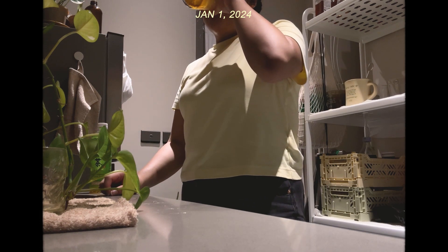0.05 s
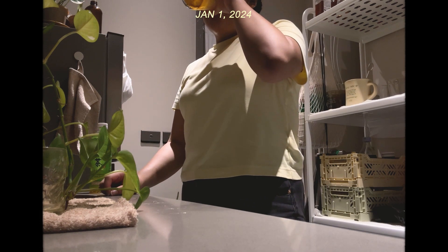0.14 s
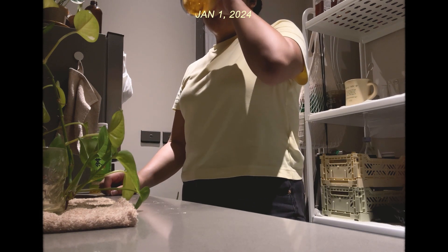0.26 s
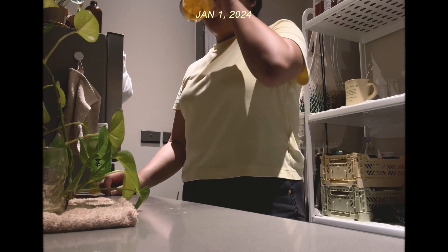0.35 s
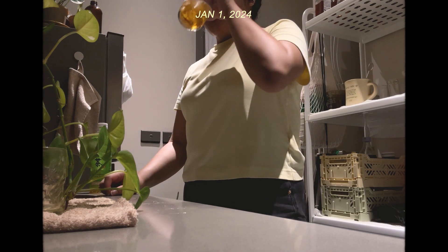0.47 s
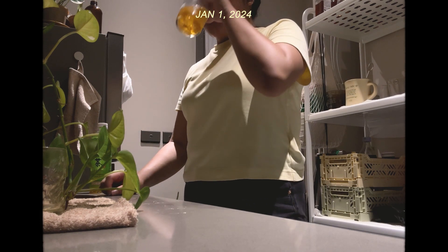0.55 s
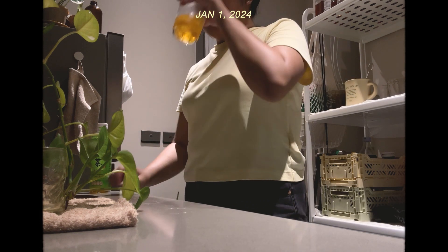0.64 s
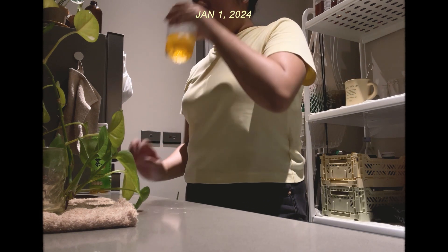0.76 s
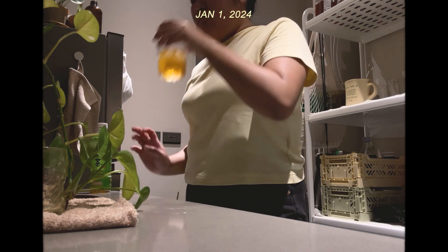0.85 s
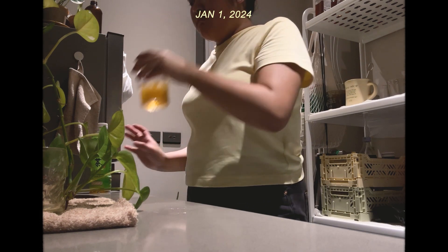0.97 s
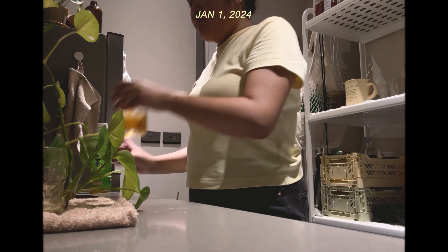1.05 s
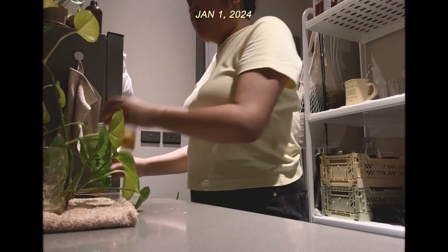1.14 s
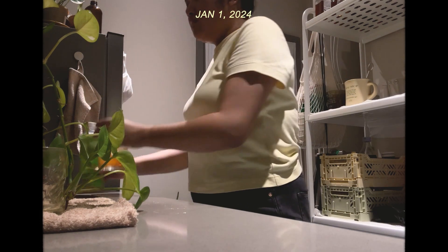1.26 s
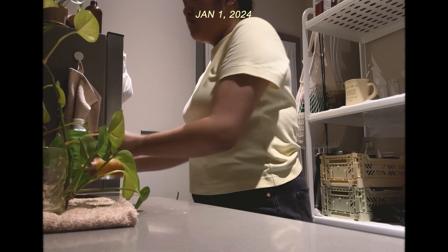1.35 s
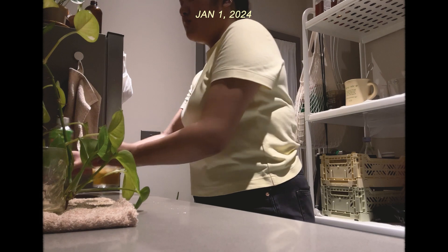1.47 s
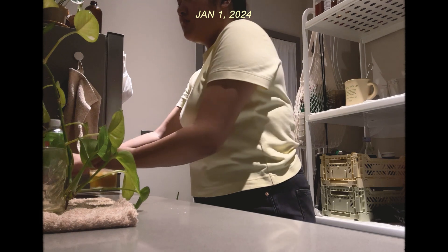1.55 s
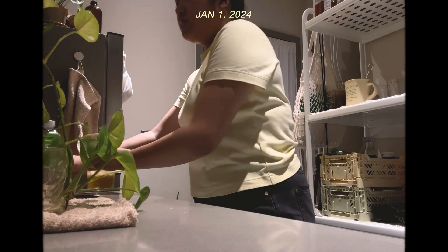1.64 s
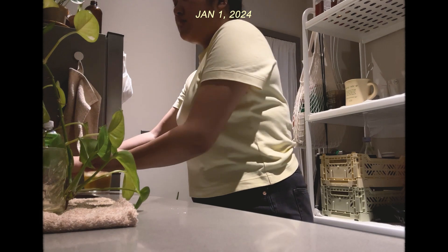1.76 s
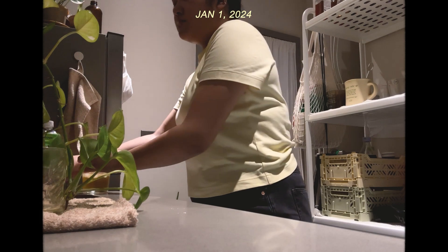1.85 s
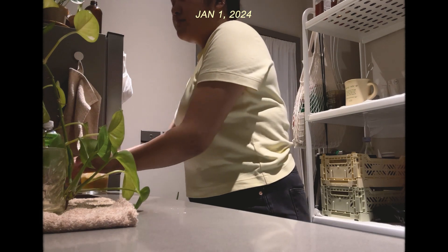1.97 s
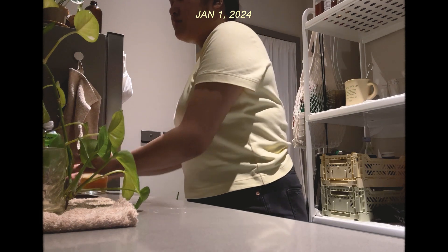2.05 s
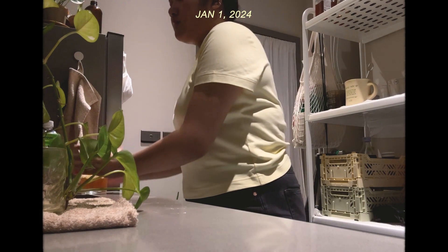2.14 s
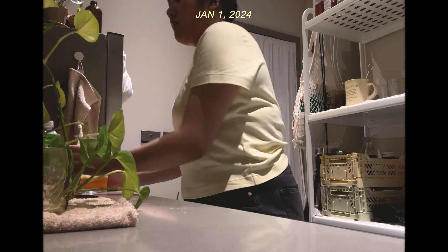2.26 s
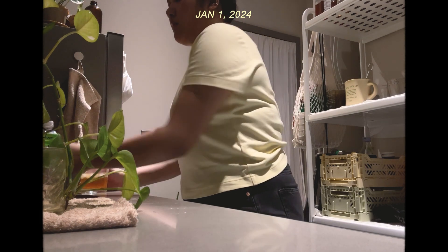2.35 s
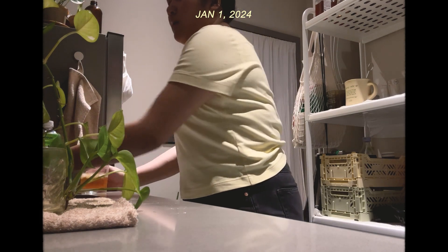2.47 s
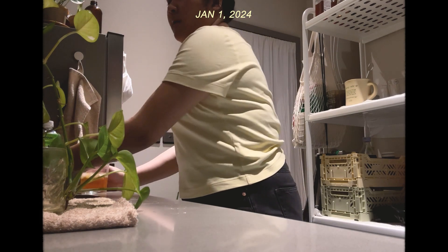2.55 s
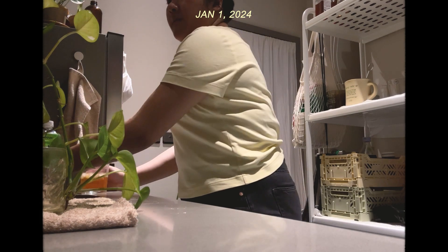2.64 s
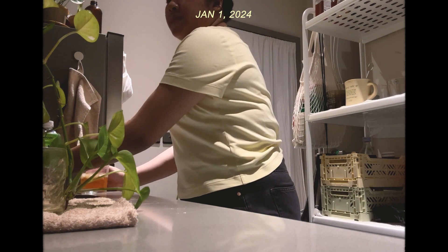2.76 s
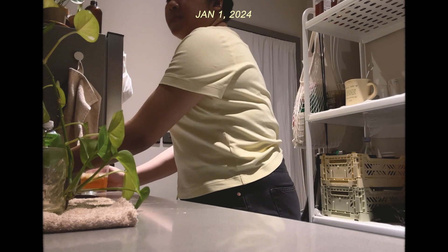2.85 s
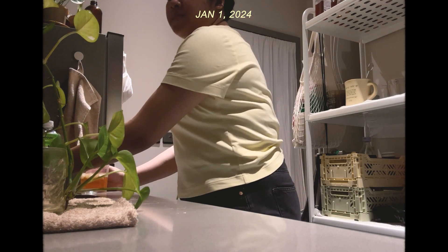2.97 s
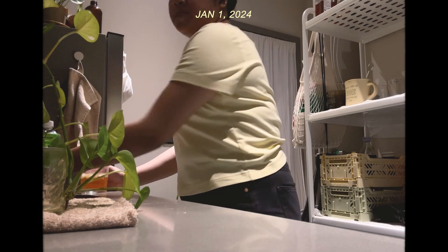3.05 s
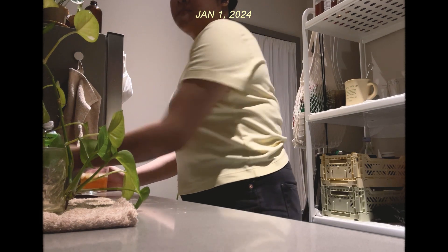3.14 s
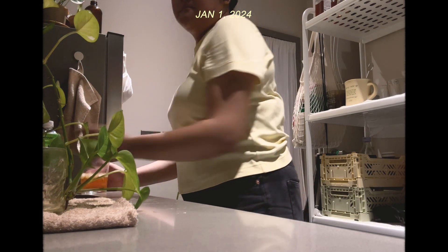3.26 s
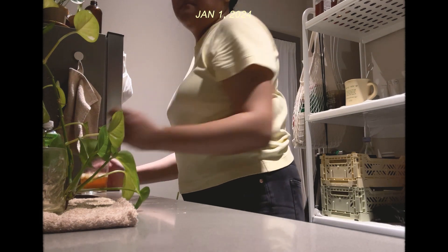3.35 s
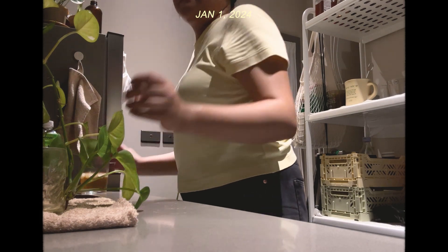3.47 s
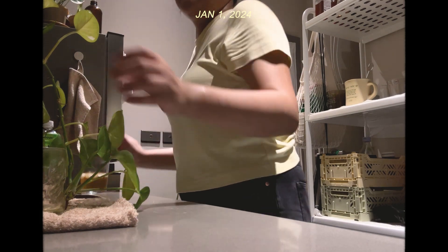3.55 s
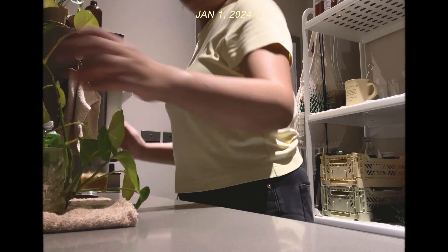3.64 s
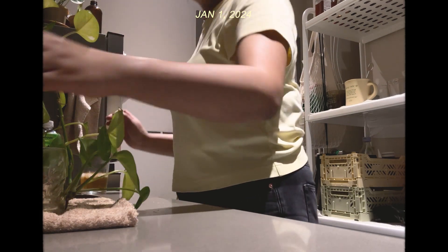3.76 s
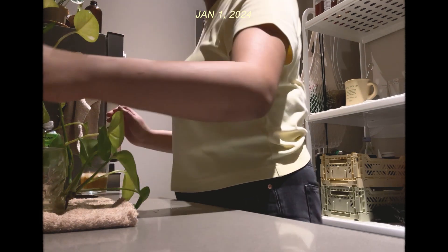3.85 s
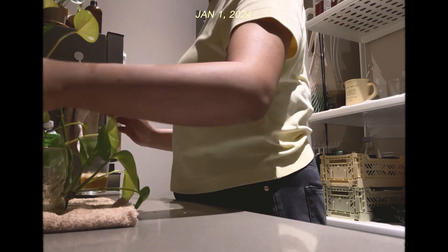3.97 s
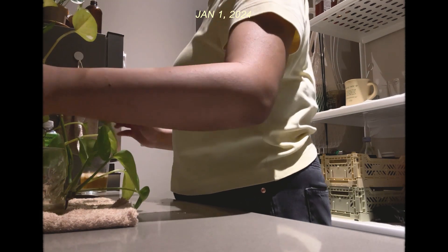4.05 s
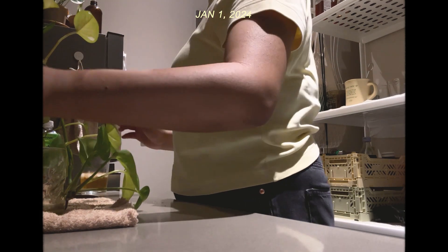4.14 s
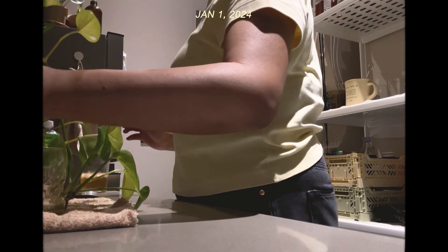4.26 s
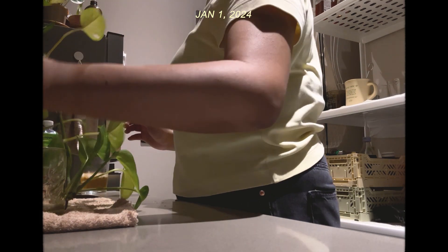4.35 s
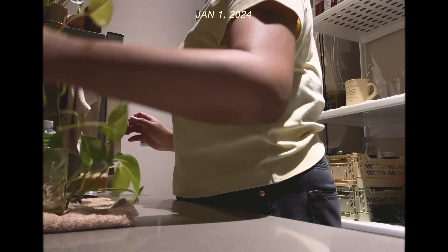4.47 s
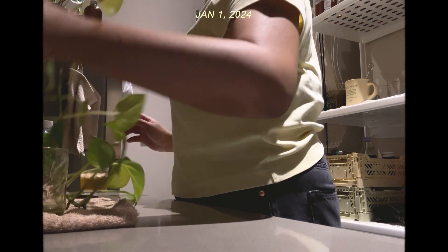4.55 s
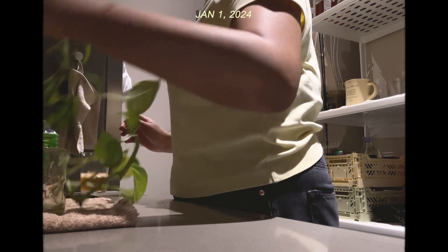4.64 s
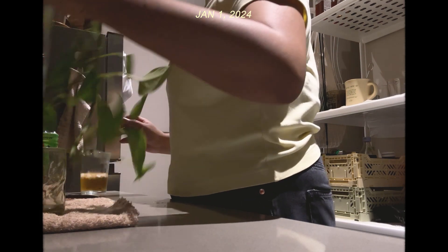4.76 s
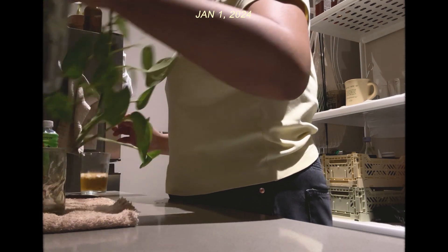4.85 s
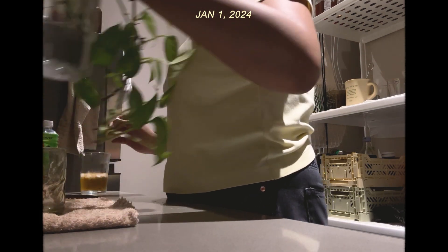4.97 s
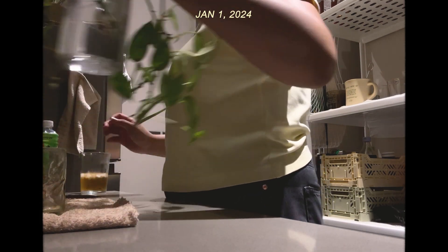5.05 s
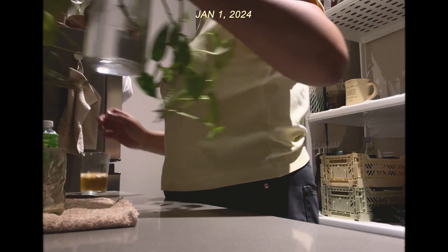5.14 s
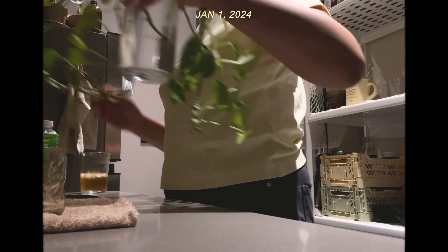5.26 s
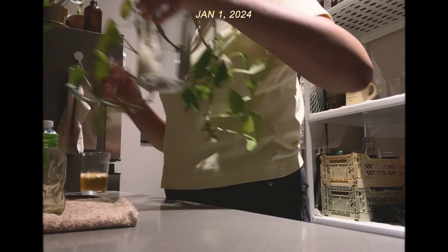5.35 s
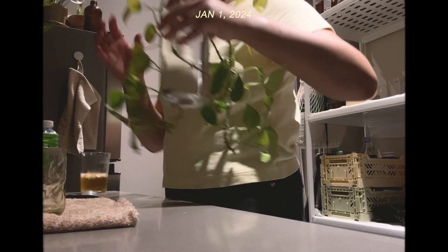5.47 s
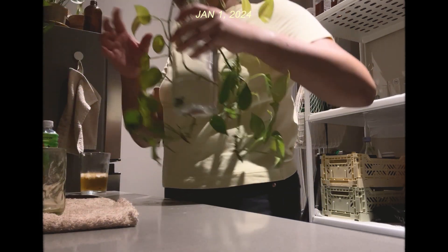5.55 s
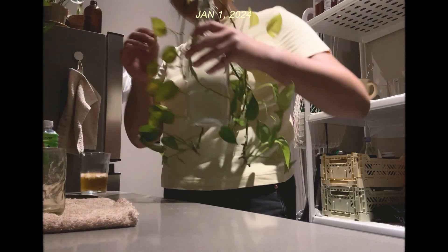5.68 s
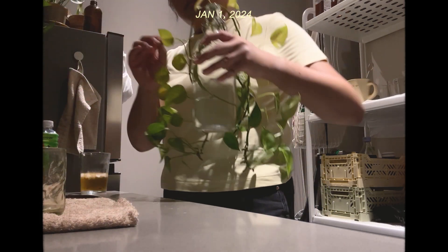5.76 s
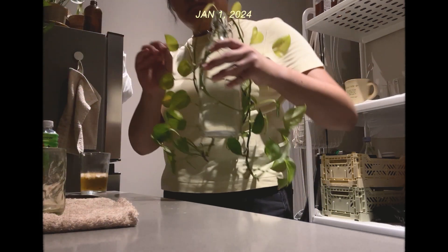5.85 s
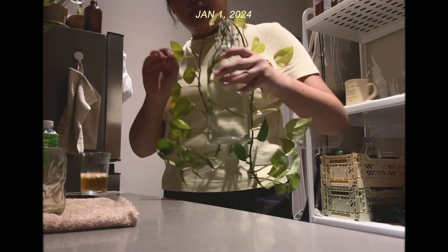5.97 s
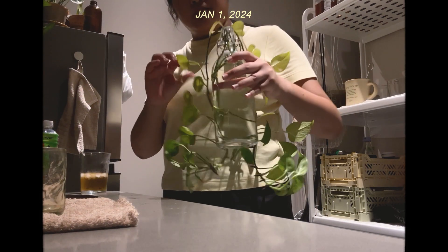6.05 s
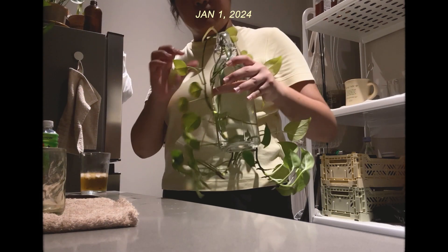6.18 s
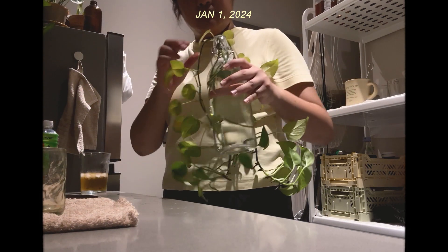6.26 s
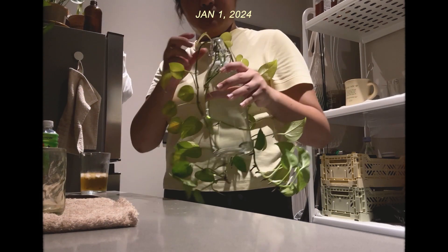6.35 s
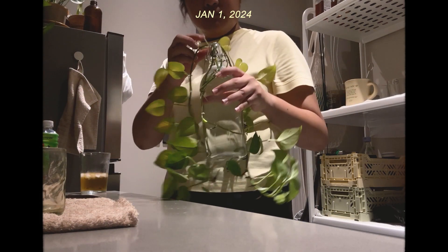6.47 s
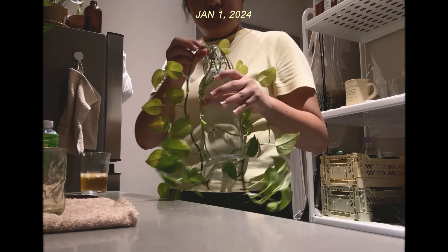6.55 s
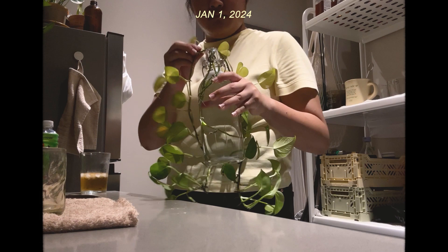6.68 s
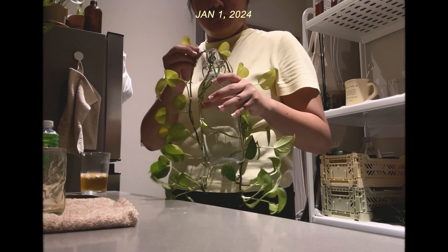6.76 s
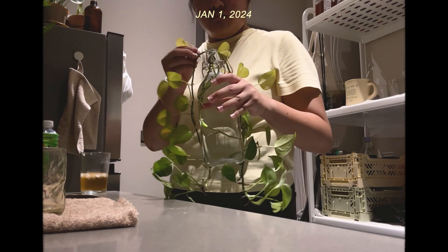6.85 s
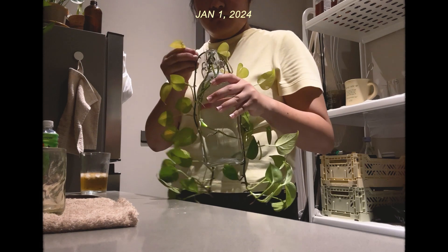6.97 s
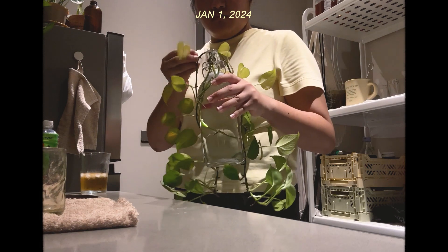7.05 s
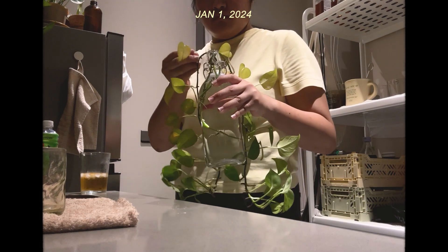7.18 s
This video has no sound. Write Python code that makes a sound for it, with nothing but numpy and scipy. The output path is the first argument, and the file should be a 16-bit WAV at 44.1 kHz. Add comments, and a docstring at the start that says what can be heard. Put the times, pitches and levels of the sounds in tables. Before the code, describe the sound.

Ice tinkles in a glass set down hard on a stone counter, then glass jars chatter together over a low ventilation drone.

```python
"""Over the drone of air handling, ice tinkles in a drinking glass that is lowered and set on a stone counter.
Then a glass jar of trailing leaves chatters against its neighbour; leaves and cloth rustle and tick throughout.
Glass, ice and stone are sums of fading tones with short noise cracks; leaves, cloth and drone are shaped noise.
Two microphones on the counter hear the direct sounds and the echoes of a small kitchen."""
import sys
import numpy as np
from scipy import signal
from scipy.fft import rfft, irfft
from scipy.io import wavfile
from scipy.ndimage import uniform_filter1d

SR = 44100
rng = np.random.default_rng(int(sys.argv[2]) if len(sys.argv) > 2 else 0)


def ratio_of_db(decibels):
    """Turn decibels (scalar or array-like) into linear amplitude factors; 0 dB maps to 1."""
    return 10 ** (np.asarray(decibels, float) / 20)


def store_pcm(level_fs):
    """Save levels as 16-bit WAV."""
    pcm = np.round(np.clip(level_fs, -1, 1) * 32767).astype(np.int16)
    wavfile.write(sys.argv[1], SR, np.atleast_2d(pcm).T)


N = 317961
TIME = np.arange(N) / SR  # seconds
HZ = np.maximum(np.fft.rfftfreq(N, 1 / SR), 1)
LEFT_RIGHT = np.array([[.5], [-.5]])  # splits a left-minus-right difference over the two sides


def ice():
    """Cubes rattle against the tumbler wall; sloshing drink shifts the pitches a little."""
    # Clear taps of ice on the wall. Each row: start in seconds, level in dB, pitch the spot favours in Hz.
    clear_taps = [(0.241, -69, 5400), (0.2567, -64.5, 3950), (0.4572, -48.5, 5760), (0.5969, -37.5, 5200),
                  (0.631, -53, 4220), (0.7444, -58, 5440), (0.83, -65, 4800), (0.8777, -62, 4600),
                  (0.9224, -58, 6350), (1.055, -54, 5300), (1.0785, -42, 5330), (1.307, -55.5, 6010),
                  (1.352, -49.5, 4600), (1.4654, -57, 6700), (1.7, -69, 5000), (1.7419, -63, 5570),
                  (1.9487, -62, 4470), (2.0016, -62, 6000), (2.0767, -68, 4500), (2.1293, -73, 3950),
                  (2.1994, -81, 6060), (2.261, -75, 3900), (2.3414, -111, 5900), (2.9222, -60, 5250)]
    # Tones of the tumbler. Each row: pitch in Hz, level in dB, time to fade by 60 dB in seconds.
    tumbler = [(2240, -14, .08), (3950, -9, .12), (4470, -3, .14), (4950, -9, .08), (5390, -5, .08),
               (5990, -2, .13), (8100, -5, .04), (8760, -6, .05), (10500, -7, .04), (12700, -18, .04)]
    # fainter taps while the drink sloshes
    slosh_start_s, slosh_end_s, slosh_taps = .22, 2.4, 60
    slosh_db, slosh_fade_db_s, slosh_scatter_db = -68.5, -2.5, 11

    def spot(hz):
        near_pitch_db = -np.minimum(50 * np.abs(np.log2(hz / spot_hz)), 18)
        return np.where(hz > 7000, -12, near_pitch_db)

    out, t = np.zeros(N), TIME[:SR // 10]
    when, size, where = rng.random((slosh_taps, 3)).T
    when = when * (slosh_end_s - slosh_start_s)
    faint_db = slosh_db + slosh_fade_db_s * when + slosh_scatter_db * size ** 2
    faint_taps = list(zip(slosh_start_s + when, faint_db, 3800 * 1.65 ** where))
    for s, db, spot_hz in clear_taps + faint_taps:
        # a first tap and a fading trail of uneven rebounds
        uneven_db = 1.47 * np.minimum(rng.exponential(size=len(t)), 6.5) - 47.5
        rattle = rng.standard_normal(len(t)) * ratio_of_db(uneven_db) * np.exp(-t / 0.013)
        rattle[0] = 1
        # drink and cubes split every tone into a close cluster
        wall = sum(ring(tumbler, spot, 3., .014) for _ in range(3)) / 2
        add(out, s, ratio_of_db(db) * signal.fftconvolve(wall, rattle))
        add(out, s, crack(db + 3, 0.0041, 5000, 2600) + crack(db - 16, 0.0076, 12000, 4000))
    return out


def knocks():
    """A heavy base meets the stone; a longer contact is duller, and the cabinet below thuds a little later."""
    # Each row: start in seconds, level in dB, thud relative to the knock in dB,
    # contact in milliseconds (below 0.02 counts as 0.02), pitch the spot favours in Hz.
    blows = [(1.204, -38.5, 5.5, 0.19, 1030), (1.601, -41.5, 9, 0.17, 1000),
             (1.653, -43.5, 7.5, 0.17, 1000), (1.738, -46, 2.5, 0.17, 1000),
             (1.835, -38.5, -22, 0.17, 1100), (1.88, -14, -10, 0.054, 940), (2.047, -27.5, -19, 0.37, 1220),
             (2.092, -31.5, -8.5, 0.45, 1160), (2.114, -38.5, -7.5, 0.37, 1090),
             (2.169, -44.5, -6, 0.33, 1750), (2.653, -46, -4, 0.07, 990), (2.849, -42.5, -4.5, 0.1, 1020),
             (3.783, -42.5, -9, 0.15, 1010), (6.947, -46.5, -8, 0.017, 1740)]
    # Tones of the stone. Each row: pitch in Hz, level in dB, time to fade by 60 dB in seconds.
    counter = [(571, 2.5, 0.11), (620, -16.5, 0.45), (684, 2, 0.046), (833, -5, 0.16), (976, -7.5, 0.14),
               (1046, 1, 0.047), (1274, 10.5, 0.015), (1279, 4, 0.039), (1430, -8.5, 0.034),
               (1515, -3, 0.08), (1700, 8, 0.018), (2380, -31, .05), (2670, -39, 0.035), (2940, -38, 0.03),
               (5470, -5.5, 0.038), (9070, -19, 0.06)]
    # Low tones of the cabinet. Each row: pitch in Hz, level in dB, time to fade by 60 dB in seconds.
    cabinet = [(132, 9.5, 0.13), (183, -29.5, 0.095), (298, -3, 0.29), (382, 5, 0.055)]
    out = np.zeros(N)
    for s, db, thud_db, contact_ms, spot_hz in blows:
        blow = ring(counter, lambda hz: -np.minimum(14 * np.abs(np.log2(hz / spot_hz)), 11), 4.5, 0.019)
        add(blow, 0, crack(-1.3, 0.0042, 2580, 1940)[:len(blow)])
        # the contact time smooths the blow
        keep = np.exp(-1000 / (max(contact_ms, .02) * SR))
        add(out, s, ratio_of_db(db) * signal.lfilter([1 - keep], [1, -keep], blow))
        add(out, s + 0.00758, ratio_of_db(db + thud_db) * ring(cabinet, np.zeros_like, 1.94))
    return out


def slide():
    """The tumbler is nudged along: its base rubs the stone and stirs broad resonances of both."""
    # Each row: peak time in seconds, level in dB, tenfold swell in seconds, tenfold fade in seconds.
    nudges = [(2.67, -61, 0.022, .08), (2.735, -57.5, 0.11, .12), (2.856, -63, 0.019, 0.11),
              (2.93, -68.5, 0.046, 0.35)]
    # What the rubbing stirs. Each row: centre in Hz, width in Hz, relative level in dB.
    rubbed = [(998, 380, 6), (2267, 640, 2.5), (3032, 1500, -1), (4180, 167, -4), (5205, 530, -8),
              (8540, 710, -10), (12500, 460, -33)]
    rub = slips()
    stirred = sum(ratio_of_db(db) * unit(band(rub, hz, width)) for hz, width, db in rubbed)
    return sum(stroke(*row) for row in nudges) * unit(stirred)


def jars():
    """Glass skips over glass; every new touch damps what was ringing and sets it off afresh."""
    # Touches of the jar on its neighbour. Each row: start in seconds, level in dB, brightness in dB per octave.
    touches = [(4.4672, -17, -1.5), (4.4877, -12, 0.5), (4.5044, -16, -1.5), (4.5214, -14.5, 5.5),
               (4.5334, -14.5, 0.5), (4.5434, -17.5, 1.5), (4.5524, -11, 1), (4.5574, -17, 8.5),
               (4.5654, -18.5, -1.5)]
    # Tones of both jars. Each row: pitch in Hz, level in dB, time to fade by 60 dB in seconds.
    glass_tones = [(1826, -5, .4), (1922, -7, .25), (1932, -1, .58), (3802, -9, .42), (4040, -3, .38),
                   (6645, -4, .24), (420, -20, .05), (570, -17, .05), (828, -5, .05), (872, -3.5, .06),
                   (1448, -20, .35), (2234, -12, .06), (2347, -12, .06), (2650, -7, .03), (2735, -6, .05),
                   (2790, -5, .05), (2900, -6, .035), (3000, -9, .03), (3467, -15, .12), (4012, -10, .12),
                   (5035, -9, .08), (5378, -20, .15), (6535, -13, .06), (7095, -22, .1), (7940, -22, .1),
                   (8393, -17, .2), (9405, -24, .15), (9803, -16, .11), (10020, -20, .1), (10655, -16, .19),
                   (11600, -18, .14), (12000, -18, .06), (12720, -19, .15), (13600, -18, .1),
                   (14220, -21, .14)]
    touch_damp_db = -5
    out = np.zeros(N)
    for s, db, tilt_db in touches:
        out[int(s * SR):] *= ratio_of_db(touch_damp_db)
        add(out, s, ratio_of_db(db) * ring(glass_tones, lambda hz: tilt_db * np.log2(hz / 3000), 2.5))
        add(out, s, crack(db - 2.0, .0025, 3200, 3500) + crack(db - 12.5, 0.003, 9500, 5000))
    return out


def ticks():
    """Leaves and fingers tick: a sharp snap of noise with a short crackling tail."""
    # Each row: start in seconds, level in dB, share of the duller band in dB, pitch of that band in Hz.
    snaps = [(0.4536, -42.5, -14, 5840), (0.5751, -41, 5.5, 5860), (0.7458, -54, -18, 5920),
             (1.055, -56, 8, 5140), (1.2006, -44.5, 15, 4520), (1.2096, -31, -7, 3740),
             (1.2616, -41.5, -20, 4990), (1.6053, -60, -8, 3500), (1.7499, -69, -19, 5960),
             (1.835, -55.5, 15.5, 3220), (2.478, -80.5, 31.5, 3340), (2.53, -66, -27, 3040),
             (2.5441, -57, -16, 4000), (2.584, -57, 10.5, 3540), (2.869, -76, 26, 5700),
             (4.3831, -67, 15, 5660), (4.4192, -66.5, 7.5, 4930), (5.6386, -60, -2, 4900),
             (5.654, -56, 12.5, 6000), (5.676, -55, -16, 4890), (6.499, -68, 17, 3270),
             (6.6128, -60, 11.5, 4300), (6.9451, -40, 6.5, 5100), (6.983, -47.5, -19, 3680),
             (7.0583, -57.5, -24, 3240), (7.1044, -81, -20, 3090)]
    tail_t60_s = 0.056
    out, t = np.zeros(N), TIME[:SR // 2]
    for s, db, body_db, body_hz in snaps:
        envelope = 0.61 * np.exp(-t / 0.0013) + 0.31 * 1000. ** (-t / tail_t60_s)
        snap = rng.standard_normal(len(t)) * envelope
        add(out, s, ratio_of_db(db) * leafy(snap, body_db, body_hz, 1800))
    return out


def rustle():
    """Leaves and cloth brush in strokes: many tiny slips that swell and fade together."""
    # Each row: peak time in seconds, level in dB, tenfold swell in seconds (above 0.2 counts as 0.2),
    # tenfold fade in seconds, share of the duller band in dB.
    strokes = [(.448, -69.5, 0.14, 0.32, 3.5), (.76, -75.5, 0.087, .25, 1), (1.233, -53, 0.11, 0.067, 4),
               (1.4, -77, .15, 1, 6.5), (3.38, -83, 0.9, 0.1, 15), (4.45, -72, 0.094, .03, 20.5),
               (4.79, -68, 0.068, 0.057, 4.5), (4.85, -75.5, .06, 0.064, 14), (5.52, -77, 0.074, 0.097, 4),
               (5.68, -77, 0.14, 0.19, 9.5), (5.912, -66, 0.11, 0.047, 4.5), (6.04, -68, 0.046, .05, -4),
               (6.11, -68, 0.081, .06, 3), (6.542, -74, 0.095, 0.052, 8.5), (6.625, -69, .04, .05, 6.5),
               (6.9, -73.5, 0.05, 0.049, -14), (6.97, -61, 0.023, 0.11, 1)]
    rub = slips()
    return sum(stroke(*row) * leafy(rub, body_db, 4500, 4500) for *row, body_db in strokes)


def drone():
    """Air handling: noise swelling in the room resonances; the bass reaches both microphones alike."""
    # Colour of the noise. Each row: frequency in Hz, relative level in dB per Hz.
    air_colour = [(22, -24), (59, -5), (109, -10), (126, -3), (142, -12), (166, -4.5), (210, -7.5),
                  (338, -14), (366, -21), (663, -19.5), (1010, -25.5), (2500, -43.5), (3600, -53.5),
                  (4500, -57), (7000, -63.5), (10500, -63.5), (11800, -84.5), (15500, -91.5)]
    # How alike left and right are. Each row: frequency in Hz, likeness from -1 (opposite) to 1 (same).
    likeness = [(60, 0.94), (130, 1), (290, 0.74), (640, -0.31), (1410, -0.022), (3100, 0.14), (6820, 0.18),
                (15000, 0.53)]
    # Resonances of the room. Each row: centre in Hz, width in Hz, boost in dB.
    room_modes = [(66, 12, 3), (110.6, 9.7, 13.8), (191, 66, 4.4), (209, 3.3, 11), (263.5, 3.3, 13),
                  (3270, 73, 8.2)]
    # Slow changes of loudness. Each row: time in seconds, level in dB.
    loudness = [(0, -47.5), (.8, -46.5), (1.3, -44.5), (1.9, -43), (2.4, -45.5), (2.85, -43.5), (3.5, -45),
                (4.4, -44.5), (4.8, -45), (5.9, -44), (7.21, -45)]
    left_minus_right_db = -3
    shape = ratio_of_db(colour(air_colour))
    for hz, width, db in room_modes:
        shape = shape * ratio_of_db(db / (1 + (2 * (HZ - hz) / width) ** 2))
    like = np.clip(colour(likeness), -.99, .99)
    mid, side = (rfft(rng.standard_normal(N)) * shape * np.sqrt(1 + sign * like) for sign in (1, -1))
    air = irfft(np.array([mid + side, mid - side]), N)
    level_db = np.interp(TIME, *np.transpose(loudness))
    return unit(air) * ratio_of_db(level_db + left_minus_right_db * LEFT_RIGHT)


def ring(modes, spot_db, scatter_db, detune=0.):
    """One blow: all tones start at once, weighted by the spot that is struck and by chance; peak 1."""
    hz, db, t60 = np.transpose(modes)[:, :, None]
    chance = rng.standard_normal((2, len(modes), 1))
    sign = (-1.) ** np.arange(len(modes))[:, None]
    swing = sign * ratio_of_db(db + spot_db(hz) + scatter_db * chance[0])
    t = TIME[:int(SR * t60.max())]
    tones = np.sin(2 * np.pi * hz * (1 + detune * chance[1]) * t)
    body = np.sum(swing * tones * 1000. ** (-t / t60), axis=0)
    return body / np.abs(body).max()


def crack(db, decay_s, hz, width):
    """The many small tones that die at once: a short coloured noise."""
    t = TIME[:SR // 4]
    return ratio_of_db(db) * band(rng.standard_normal(len(t)) * np.exp(-t / decay_s), hz, width)


def leafy(x, body_db, body_hz, body_width):
    """A bright papery band over a duller one."""
    return band(x, 11500, 9000) + ratio_of_db(body_db) * band(x, body_hz, body_width)


def stroke(s, db, swell_s, fade_s):
    """Gain that climbs tenfold over the swell, drops tenfold over the fade, silent beyond twice those times."""
    before = (s - TIME) / np.clip(swell_s, .005, .2)
    after = (TIME - s) / max(fade_s, .005)
    away = np.where(TIME < s, before, after)
    return ratio_of_db(db) * np.maximum(10 ** -away - .01, 0)


def slips():
    """Dense tiny slips of uneven size, with a wandering level."""
    uneven_db = 2.0 * rng.exponential(size=N) + 5.5 * walk(40)
    return unit(rng.standard_normal(N) * ratio_of_db(uneven_db))


def walk(rate):
    """Random levels held for 1 / rate seconds, then smoothed twice."""
    k = int(SR / rate)
    held = np.repeat(rng.standard_normal(N // k + 1), k)
    return uniform_filter1d(uniform_filter1d(held, k), k)[:N]


def band(x, hz, width):
    """Steep resonance: the same peak filter twice, with gain 1 at its centre."""
    shape = signal.iirpeak(hz, hz / width, fs=SR)
    return signal.lfilter(*shape, signal.lfilter(*shape, x))


def colour(points):
    """Read a table of Hz and value on a log-frequency axis."""
    hz, value = np.transpose(points)
    return np.interp(np.log(HZ), np.log(hz), value)


def unit(x):
    """Scale to an rms of 1."""
    return x / np.sqrt(np.mean(x ** 2))


def add(track, s, sound):
    """Mix a sound into a track at time s in seconds."""
    i = int(s * SR)
    track[i:i + len(sound)] += sound[:N - i]


def kitchen(x, place_m, lag_ms, pan_db, wet_db):
    """Direct sound a little earlier and louder on one side, then the walls."""
    # Colour of the microphones. Each row: frequency in Hz, gain in dB.
    mic_colour = [(25, -20.5), (90, 0), (2000, 4.5), (5500, 1), (7200, 2), (9500, 4.5), (13000, -7.5),
                  (15500, -12.5)]
    direct = np.exp(-2j * np.pi * HZ * LEFT_RIGHT * lag_ms / 1000)
    gain = ratio_of_db(colour(mic_colour) + pan_db * LEFT_RIGHT)
    return irfft(rfft(x) * gain * (direct + ratio_of_db(wet_db) * echoes(place_m)), N)


def echoes(place_m, count=22):
    """Mirror images of the source in the six walls, as a spectrum for each microphone; treble dies sooner."""
    room_m, mics_m = (2.31, 3.47, 2.63), [(.83, 1.19, .97), (.83, 1.35, .97)]
    sound_m_s = 343
    n = np.mgrid[-count:count + 1, -count:count + 1, -count:count + 1].reshape(3, -1).T
    n = n[np.abs(n).sum(axis=1) > 0]  # leaves out the direct sound
    image = (n + n % 2) * np.array(room_m) + (1 - 2 * (n % 2)) * np.array(place_m)
    # cupboards and shelves shift the echoes and turn some over
    scramble = np.array([[12.99, 78.23, 37.72], [39.35, 11.13, 83.16]])
    clutter = np.sin(4375.5 * np.sin(scramble @ n.T))
    turned = np.sign(clutter[1])
    out = []
    for mic in mics_m:
        s = np.sqrt(np.sum((image - mic) ** 2, axis=1)) / sound_m_s
        lag = ((s - s.min() + .004 + .003 * clutter[0]) * SR).astype(int)
        # 60 dB fade times in seconds: bass, treble
        low, high = (rfft(np.bincount(lag, turned / s * 1000. ** (-s / t60)), N) for t60 in (.25, .16))
        share = 1 / (1 + (HZ / 2000) ** 2)
        out.append(share * low + (1 - share) * high)
    return np.array(out) / np.sqrt(np.mean(np.abs(out) ** 2))


def scene():
    """Counter sounds, jars, and ice with leaves each have their place, all a little louder on the right."""
    counter_m, jar_m, ice_and_leaves_m = (1.52, 1.79, 1.03), (1.19, 1.43, 1.01), (1.71, 1.37, 1.32)
    jar_sound = kitchen(jars() * ratio_of_db(-1), jar_m, -0.026, -.9, -5.0)
    counter_sound = kitchen((knocks() + slide()) * ratio_of_db(-3.0), counter_m, 0.033, -2.5, -0.45)
    ice_sound = kitchen(ice(), ice_and_leaves_m, -0.087, -3.8, 0.5)
    leaf_sound = kitchen(ticks() + rustle(), ice_and_leaves_m, -0.097, -1.5, -0.73)
    return drone() + jar_sound + counter_sound + ice_sound + leaf_sound


def band_limit(x):
    """A steep low-pass at the top of the band."""
    return signal.sosfilt(signal.butter(12, 15820, fs=SR, output="sos"), x)


def record(dry):
    """The finished mix fades out over its last 6 milliseconds."""
    fade = np.minimum(TIME[::-1] / .006, 1)
    return band_limit(dry * fade)


dry = scene()
out = record(dry)
store_pcm(out)
```